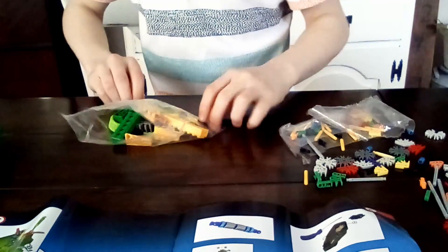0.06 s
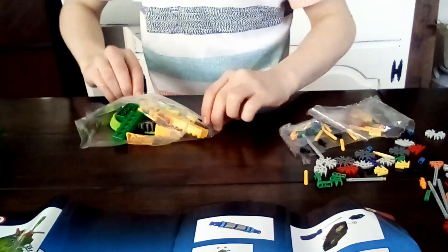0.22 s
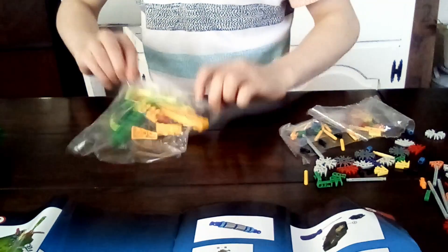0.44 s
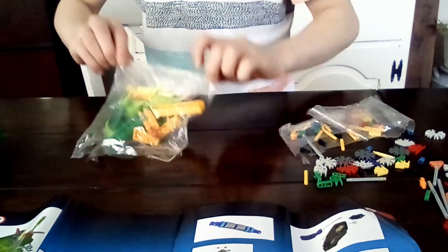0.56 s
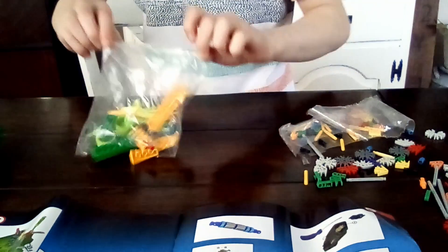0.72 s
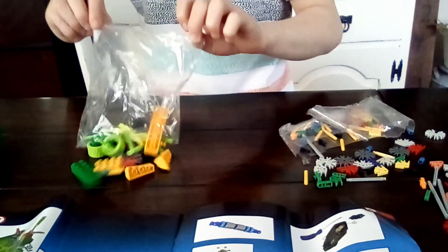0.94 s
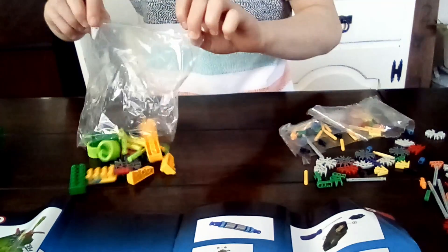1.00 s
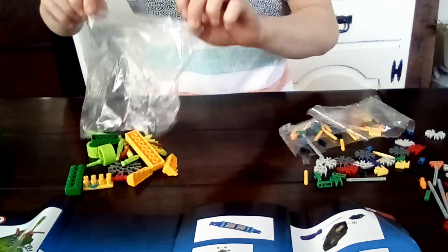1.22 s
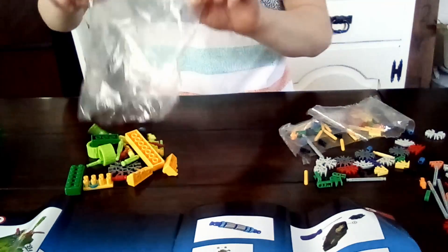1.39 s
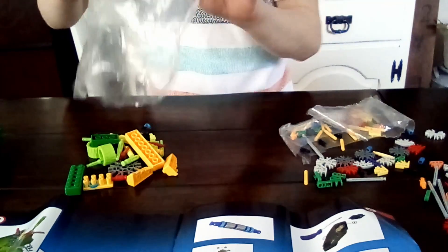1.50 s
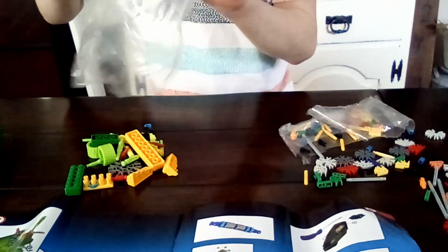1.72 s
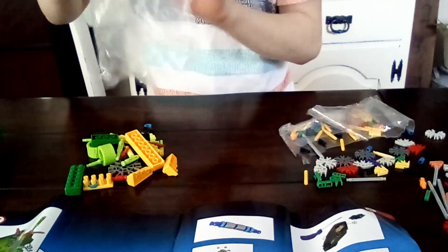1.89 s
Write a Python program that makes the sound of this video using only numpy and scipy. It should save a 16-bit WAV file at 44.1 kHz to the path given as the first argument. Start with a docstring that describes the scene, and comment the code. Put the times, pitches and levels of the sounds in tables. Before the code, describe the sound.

Hard little toy bricks jostle inside a rustling plastic bag, with soft table bumps and sharp clacks, then pour onto wood and settle; the empty bag ticks lightly. Close single-channel pickup, small lively room, faint hiss.

```python
"""In a small, lively room, a thin plastic bag is dragged over a wooden table and lifted; small plastic
building pieces slide inside it, tumble out and clatter on the table top. The empty bag then gives faint snaps.
Dense random contacts, filtered, make the film, the rattle and the scraped wood; single collisions, snaps and
bright clicks are clusters of decaying modes with a noise crack; blows excite the modes of the table and of one
ringing piece. Decaying noise serves as the room's response, and filtered steady noise as its quiet hiss."""
import sys
import numpy as np
from scipy import signal
from scipy.fft import rfft, irfft, next_fast_len
from scipy.io import wavfile
from scipy.ndimage import uniform_filter1d

SR = 44100
rng = np.random.default_rng(int(sys.argv[2]) if len(sys.argv) > 2 else 0)


def log_audio(samples):
    """Write samples as a 16-bit WAV file to the path given in sys.argv[1]."""
    # one column per channel
    frames = np.atleast_2d(samples).T
    # limit to full scale, then quantise
    limited = np.clip(frames, -1, 1)
    pcm = np.round(limited * 32767).astype(np.int16)
    wavfile.write(sys.argv[1], SR, pcm)


N = 85995

# Levels are relative: the source functions trim or filter most of them.
# Room hiss spectrum: (frequency [Hz], level [dB])
HISS_SPECTRUM = [(25, -14), (90, 5.5), (250, 9.5), (420, 1.5), (1200, -9.5), (3000, -4), (6000, -26),
                 (9000, -38)]
HISS_RMS_DB = -69.5
# Reverberation: (frequency [Hz], decay by 60 dB [s])
ROOM_DECAY = [(2500, 0.23), (6000, 0.2), (15000, 0.13)]
BAND_LIMIT_HZ = 15900

# Soft bumps of hands and bag on the table: (time [s], level [dB], centre of the weight [Hz])
THUDS = [(.03, -48, 65), (0.154, -48.5, 132), (0.25, -48.5, 156), (0.33, -43.5, 108), (0.531, -44, 137),
         (0.602, -42, 93.5), (0.63, -48, 273), (0.69, -45, 169), (0.727, -46.5, 206), (0.779, -43.5, 155),
         (1.572, -56, 136)]
# Low modes of the table: (frequency [Hz], level [dB], decay by 60 dB [s])
TABLE_MODES = [(66, -6, 0.11), (102, -12, 0.28), (133.7, 2.5, 0.099), (172, -4.5, 0.19), (238.3, 5.5, 0.27),
               (266.4, 4, 0.43)]
# Thud spectrum: (frequency [Hz], level [dB])
THUD_SPECTRUM = [(20, -43.5), (55, 1.5), (100, -1), (280, -1), (500, -7), (2000, -48.5)]
THUD_ATTACK_S = 0.0071
THUD_DB_PER_OCT2 = 17.5  # loss of a mode, per squared octave from the centre

# The filled bag scraping over the table: (time [s], level [dB])
DRAG_LEVEL = [(0, -57), (.10, -67), (.15, -56), (.33, -53.5), (.44, -41.5), (.56, -49), (.635, -40),
              (.675, -54.5), (.74, -42.5), (.83, -53), (.86, -91)]
# Spectrum of the scraped wood: (frequency [Hz], level [dB])
SCRAPE_SPECTRUM = [(80, -30.5), (170, -12), (250, 0), (320, -3), (430, 4.5), (1500, -2.5), (2500, -20),
                   (6000, -39.5)]
# Loose pieces drumming on the bare table: (time [s], level [dB])
DRUM_LEVEL = [(.78, -39), (.92, -41), (1.03, -35.5), (1.15, -34), (1.23, -39.5), (1.30, -51.5), (1.39, -82)]
# Spectrum of the drummed wood: (frequency [Hz], level [dB])
WOOD_SPECTRUM = [(100, -39), (410, -19), (540, -4), (1000, -4), (1300, -3.5), (2500, -6.5), (6000, -71.5)]
# Resonances of the drummed wood: (frequency [Hz], width [Hz], lift [dB])
WOOD_PEAKS = [(517, 37, 7), (696.4, 31, 10), (995, 70, 8.5), (2020, 30, 10.5)]

# Last ticks of the empty bag and the settling pieces:
# (time [s], level [dB], pitch [Hz], crack [dB], decay by 60 dB [s], spread of the modes [log pitch])
SNAPS = [(1.5658, -32.5, 3690, -5, 0.0075, 0.32), (1.653, -39.5, 5360, 0, 0.015, 0.19),
         (1.657, -38, 1970, -8, 0.02, .35), (1.67, -42.5, 1500, -1, 0.022, 0.22),
         (1.7055, -26, 4500, -7.5, .005, 0.59), (1.7154, -34, 3270, -4, 0.0036, 0.17),
         (1.725, -31.5, 3620, 3, 0.0061, 0.456), (1.815, -26.5, 4900, -9.5, 0.0057, 0.44),
         (1.8611, -36.5, 3120, -15, 0.0055, 0.36), (1.8777, -29, 4470, -15, 0.005, 0.4)]
# Spectrum of these last ticks: (frequency [Hz], level [dB])
SNAP_SPECTRUM = [(200, -17), (800, 1.5), (2000, -2), (6500, 3), (8500, -1), (13000, -5.5), (15500, -5)]
# Resonances of these last ticks: (frequency [Hz], width [Hz], lift [dB])
SNAP_PEAKS = [(1286, 41, 12), (1893, 93, 14), (2204, 100, 9), (4650, 130, 0.5)]

# The bag being handled: (time [s], level [dB])
BAG_LEVEL = [(0, -43), (.122, -43), (.135, -37), (.215, -34), (.275, -32), (.305, -41.5), (.40, -34),
             (.53, -28.5), (.64, -30.5), (.68, -40.5), (.745, -34.5), (.85, -54), (1.19, -39),
             (1.26, -83.5)]
# Spectrum of the moving film: (frequency [Hz], level [dB])
FILM_SPECTRUM = [(200, -34), (600, -13), (2000, -9.5), (4400, -2), (6800, 0), (8500, -7), (10500, -12.5),
                 (13500, -11.5), (15500, -7)]
# Resonances of the moving film: (frequency [Hz], width [Hz], lift [dB])
FILM_PEAKS = [(4860, 360, 9), (5630, 370, 11), (6506, 205, 10), (12120, 490, 10)]
# Sharp bright clicks of the bag's film or of small pieces: (time [s], level [dB], pitch [Hz])
BRIGHT_CLICKS = [(0.1325, -25, 6430), (0.1565, -18.5, 6030), (1.1314, -24, 12160)]
BRIGHT_T60_S, BRIGHT_SPREAD = 0.02, 0.148  # spread in log pitch
PATCH_DEPTH_DB = 3  # depth of random gain patches laid over the crinkle

# Pieces jostling: (time [s], level of their rattle [dB])
RATTLE_LEVEL = [(0, -39.5), (.10, -51), (.15, -40), (.33, -48.5), (.37, -38), (.47, -36.5), (.53, -33.5),
                (.635, -26.5), (.675, -36), (.735, -28.5), (.80, -35.5), (.90, -37), (1.03, -35.5),
                (1.15, -32), (1.215, -37), (1.27, -52), (1.39, -80)]
# Rattle spectrum: (frequency [Hz], level [dB])
RATTLE_SPECTRUM = [(400, -42), (1200, -11), (2400, 2), (3700, 0), (5000, -4), (6600, -4), (7800, -26),
                   (10000, -27), (13500, -27.5), (15500, -23)]
# Rattle resonances: (frequency [Hz], width [Hz], lift [dB])
RATTLE_PEAKS = [(11800, 320, 5.5), (15100, 450, 14)]

# Pieces hitting each other and the table: (time [s], level [dB], pitch [Hz])
CLACKS = [(0.0668, -20.5, 2330), (0.3707, -15, 4160), (0.3898, -14.5, 5130), (.494, -11, 3160),
          (0.5504, -10.5, 6250), (0.561, -11, 4270), (0.5968, -12, 4770), (0.6722, -18, 5700),
          (0.6915, -9, 4350), (0.7786, -18, 4480), (0.9564, -13, 4320), (1.0016, -19, 3700),
          (1.019, -15.5, 3370), (1.0296, -12.5, 4530), (1.0454, -16, 4700), (1.0812, -10.5, 4510),
          (1.094, -17.5, 3920), (1.1182, -16.5, 3210), (1.1279, -13, 3590), (1.1299, -16.5, 5270),
          (1.149, -21, 3550), (1.1552, -15, 3560), (1.176, -20, 4350), (1.1838, -15.5, 3480),
          (1.2275, -23, 3200), (1.327, -38, 4010), (1.3462, -37, 2960), (1.4325, -51, 3240),
          (1.5125, -52, 3070)]
# Spectrum of the hard plastic: (frequency [Hz], level [dB])
PLASTIC_SPECTRUM = [(120, -52.5), (700, -18.5), (2200, -1), (6600, 0.5), (8200, -14), (11000, -20.5),
                    (16000, -12)]
# Blows on one hard piece that rings: (time [s], level [dB])
RINGS = [(.4893, -18.5), (.4955, -15.5), (0.5197, -22)]
# Modes of that piece: (frequency [Hz], level [dB], decay by 60 dB [s])
RING_MODES = [(3715, -9, .07), (4100, -2.5, 0.14), (4110, -4, 0.038), (4480, -17, 0.067), (5990, -9, 0.079),
              (6500, -8, .055)]
CLACK_T60_S, CLACK_SPREAD, CLACK_CRACK_DB = 0.012, 0.312, 8.5  # spread in log pitch
CHATTER_S, CHATTER_DB = 0.0014, -5  # a piece touches again just after it lands

# Every click: decay of its crack, and time constant of its onset
CRACK_T60_S, CONTACT_S = 0.009, 0.00014


def amp(db):
    """Level as the logarithm of amplitude: decibels to gain."""
    return 10 ** (np.asarray(db) / 20)


def unit(x):
    """Normalisation of mean power: scale to rms 1."""
    return x / np.sqrt(np.mean(x ** 2) + 1e-20)


def along(points, hz):
    """Interpolation of (frequency, value) points on a logarithmic frequency axis."""
    f, v = np.transpose(points)
    return np.interp(np.log(hz + 1), np.log(f + 1), v)


def level_curve(rows):
    """Linear interpolation of (time, level) points, one level per sample."""
    s, db = np.transpose(rows)
    return np.interp(np.arange(N) / SR, s, db)


def add(out, s, sound):
    """Superposition: mix a sound into out, in place, from time s."""
    part = out[max(0, round(s * SR)):][:len(sound)]
    part += sound[:len(part)]


def colour(x, spectrum, peaks=()):
    """Minimum-phase filtering: a spectrum and its resonances, made causal by folding the cepstrum."""
    m = 2 * next_fast_len(len(x))
    hz = np.fft.rfftfreq(m, 1 / SR)
    db = along(spectrum, hz)
    for f, width, lift in peaks:
        db = db + lift / (1 + (2 * (hz - f) / width) ** 2)
    cepstrum = irfft(np.log(amp(db)), m)
    cepstrum[1:m // 2] *= 2
    cepstrum[m // 2 + 1:] = 0
    response = np.exp(rfft(cepstrum))
    return irfft(rfft(x, m) * response, m)[:len(x)]


def room_tail():
    """Frequency-dependent reverberation: noise of energy 1 whose bands decay at their own rates."""
    hz, t, z = signal.stft(rng.standard_normal(SR // 3), SR, nperseg=256)
    decay = amp(-60 * t / along(ROOM_DECAY, hz)[:, None])
    tail = signal.istft(z * decay, SR, nperseg=256)[1]
    tail = tail * (1 - np.exp(-np.arange(len(tail)) / SR / 0.00052))  # soft onset
    return tail / np.linalg.norm(tail)


def in_room(x, wet_db):
    """Reverberation by convolution: the direct sound plus a fresh random tail for each seventh of a second."""
    out, size = np.pad(x, (0, SR // 3)), SR // 7
    for start in range(0, len(x), size):
        answer = signal.fftconvolve(x[start:start + size], room_tail())
        add(out, start / SR, amp(wet_db) * answer)
    return out


def patter(per_s, scatter_db, t60, count):
    """Random impulse excitation: uneven contacts shared among count briefly sounding noise bursts."""
    t, out = np.arange(SR // 20) / SR, np.zeros(N)
    for _ in range(count):
        contacts = rng.random(N) < per_s / count / SR
        sizes = amp(scatter_db * np.clip(rng.standard_normal(N), -2, 1.5))
        burst = unit(rng.standard_normal(len(t)) * amp(-60 * t / t60))
        out += signal.fftconvolve(contacts * sizes, burst)[:N]
    return out


def gain_patches(x, depth_db):
    """Time-frequency modulation: random patches of gain, some 700 Hz wide and 20 ms long."""
    z = signal.stft(x, nperseg=256)[2]
    patches = uniform_filter1d(rng.standard_normal(z.shape), size=4, axis=0)
    patches = uniform_filter1d(patches, size=7, axis=1)
    shared = uniform_filter1d(rng.standard_normal(z.shape[1]), size=4)  # all frequencies together
    gain = amp(depth_db * (unit(patches) + .5 * unit(shared)))
    return signal.istft(z * gain, nperseg=256)[1][:len(x)]


def click(hz, t60, spread, crack_db, count=6):
    """Impact of a small body: a noise crack and a cluster of quickly dying modes around a pitch, peak 1."""
    t = np.arange(SR // 20) / SR
    modes = np.zeros(len(t))
    for place in np.linspace(-1, 1, count) + rng.normal(0, 0.099, count):
        strength = amp(rng.normal(0, 2.2) - 1.8 * place * place) * rng.choice([-1, 1])
        modes += strength * np.sin(2 * np.pi * hz * np.exp(spread * place) * t)
    crack = amp(crack_db - 60 * t / CRACK_T60_S) * rng.standard_normal(len(t))
    sound = modes * amp(-60 * t / t60) + crack
    sound = sound * (1 - np.exp(-t / CONTACT_S))
    return sound / np.abs(sound).max()


def ring(modes, attack_s):
    """Modal superposition: one blow sets off decaying sinusoids of random phase and uneven strength."""
    t = np.arange(SR // 3) / SR
    sound = np.zeros(len(t))
    for hz, db, t60 in modes:
        envelope = amp(db + rng.normal(0, 3.07) - 60 * t / t60)
        sound += envelope * np.sin(2 * np.pi * (hz * t + rng.random()))
    return sound * (1 - np.exp(-t / attack_s))


def room_hiss():
    """Stationary noise: the quiet hiss of the room is filtered Gaussian noise."""
    return amp(HISS_RMS_DB) * unit(colour(rng.standard_normal(N), HISS_SPECTRUM))


def thuds():
    """Selective modal excitation: soft bumps favour the table modes near each bump's centre."""
    out = np.zeros(N)
    for s, db, centre in THUDS:
        modes = []
        for hz, level, t60 in TABLE_MODES:
            loss_db = THUD_DB_PER_OCT2 * np.log2(hz / centre) ** 2
            modes.append((hz, level - loss_db, t60))
        add(out, s, amp(db) * ring(modes, THUD_ATTACK_S))
    return colour(out, THUD_SPECTRUM)


def table_top():
    """Contact-driven wood: dull under the dragged bag, thinner under the loose pieces."""
    scrape = patter(per_s=900, scatter_db=3.5, t60=0.022, count=4)
    scrape = unit(colour(scrape, SCRAPE_SPECTRUM))
    drum = patter(per_s=540, scatter_db=0.5, t60=0.0065, count=4)
    drum = unit(colour(drum, WOOD_SPECTRUM, WOOD_PEAKS))
    wood = amp(level_curve(DRAG_LEVEL)) * scrape + amp(level_curve(DRUM_LEVEL) - 8) * drum
    return in_room(wood, wet_db=-3.5)[:N]


def snaps():
    """Snap-through: creases of the empty bag flip over as it is moved away, and the last pieces settle."""
    out = np.zeros(N)
    for s, db, hz, crack_db, t60, spread in SNAPS:
        snap = amp(db - 2.5) * click(hz, t60, spread, crack_db)
        add(out, s, in_room(snap, wet_db=-2.5))
    return colour(out, SNAP_SPECTRUM, SNAP_PEAKS)


def bag():
    """Crackling noise: tiny creases click densely in the moving film; a few sharp bright clicks join them."""
    crinkle = patter(per_s=1000, scatter_db=2.5, t60=0.0042, count=8)
    crinkle = colour(crinkle, FILM_SPECTRUM, FILM_PEAKS)
    crinkle = unit(gain_patches(crinkle, PATCH_DEPTH_DB))
    out = amp(level_curve(BAG_LEVEL) - 2.5) * crinkle
    for s, db, hz in BRIGHT_CLICKS:
        add(out, s, amp(db) * click(hz, BRIGHT_T60_S, BRIGHT_SPREAD, crack_db=5))
    return in_room(out, wet_db=-4.5)[:N]


def tumble():
    """Granular collision noise: many light contacts rattle the pieces against each other."""
    rattle = patter(per_s=500, scatter_db=5.5, t60=0.015, count=8)
    rattle = unit(colour(rattle, RATTLE_SPECTRUM, RATTLE_PEAKS))
    return in_room(amp(level_curve(RATTLE_LEVEL) - 4) * rattle, wet_db=-3)[:N]


def clacks():
    """Hard impact with rebound: each collision is a quick double contact, and one piece rings on."""
    hits, rings = np.zeros(N), np.zeros(N)
    for s, db, hz in CLACKS:
        contact = click(hz, CLACK_T60_S, CLACK_SPREAD, CLACK_CRACK_DB)
        rebound = amp(CHATTER_DB) * click(hz, CLACK_T60_S, CLACK_SPREAD, CLACK_CRACK_DB)
        add(contact, CHATTER_S * rng.uniform(.4, 1.6), rebound)
        add(hits, s, in_room(amp(db + 1.0) * contact, wet_db=-6.5))
    for s, db in RINGS:
        add(rings, s, amp(db) * ring(RING_MODES, attack_s=0.00017))
    return colour(hits, PLASTIC_SPECTRUM) + in_room(rings, wet_db=-30.0)[:N]


def scene():
    """Linear superposition: all sources add over the quiet hiss of the room, in one channel."""
    background = room_hiss() + thuds() + table_top()
    foreground = snaps() + bag() + tumble() + clacks()
    return (background + foreground)[None]


def record(dry):
    """Band limitation: the spectrum falls to nothing across a 300 Hz slope centred on the limit."""
    m = next_fast_len(N + SR // 2)
    hz = np.fft.rfftfreq(m, 1 / SR)
    keep = np.clip((BAND_LIMIT_HZ - hz) / 300 + .5, 0, 1)
    return irfft(rfft(dry, m) * keep, m)[..., :N]


dry = scene()
out = record(dry)
log_audio(out)
```